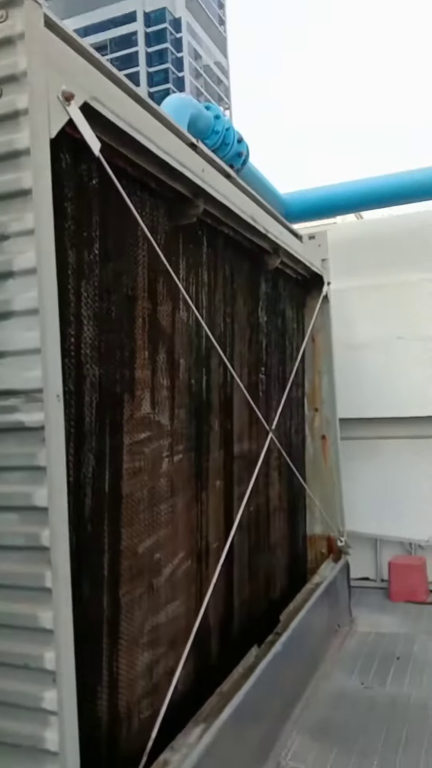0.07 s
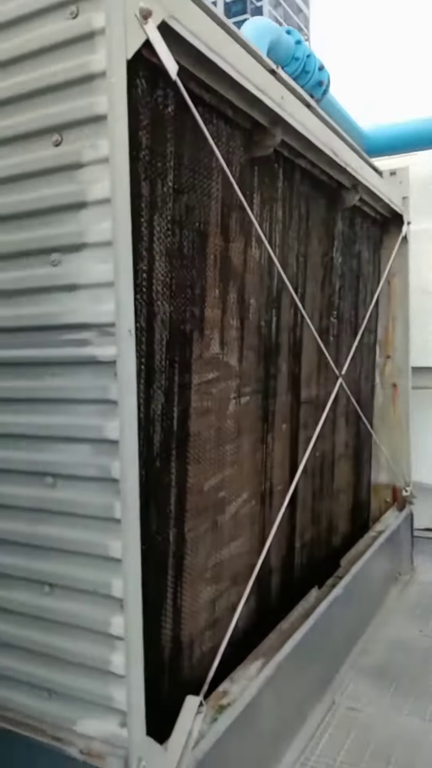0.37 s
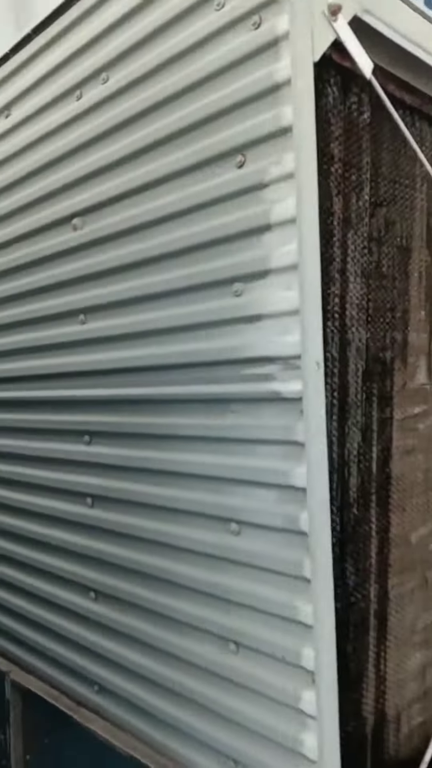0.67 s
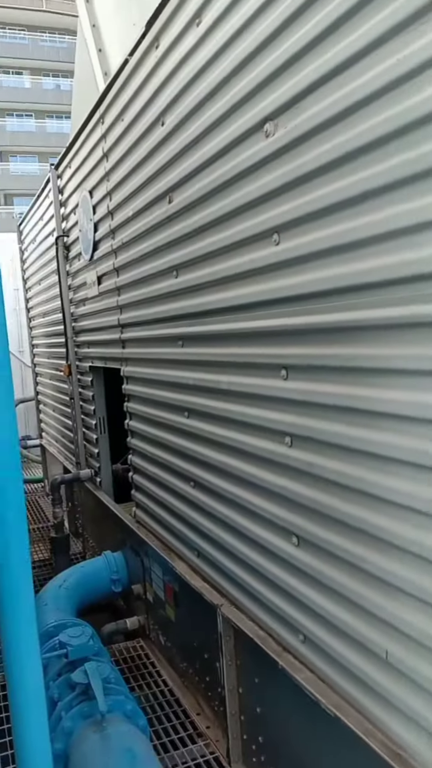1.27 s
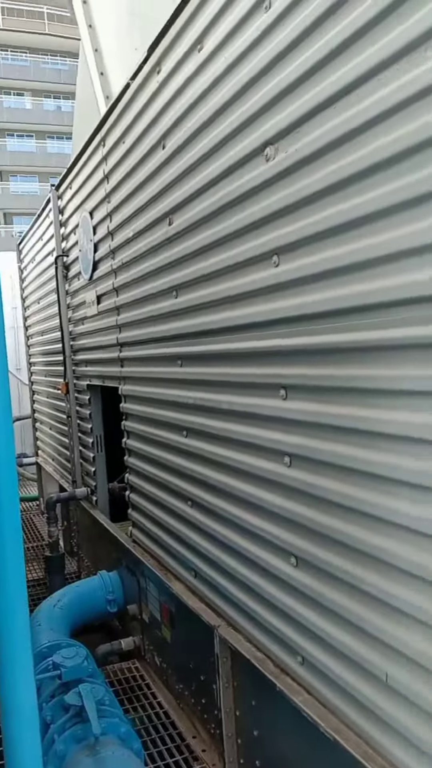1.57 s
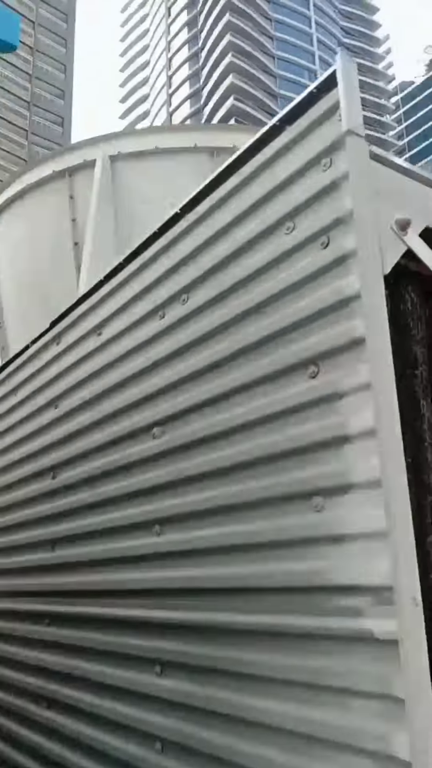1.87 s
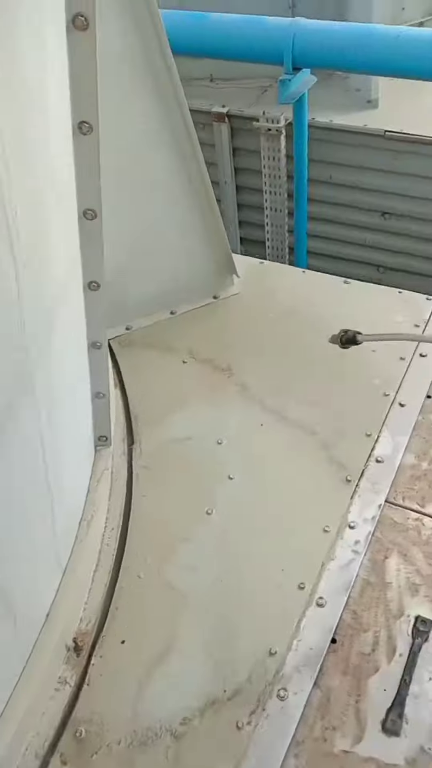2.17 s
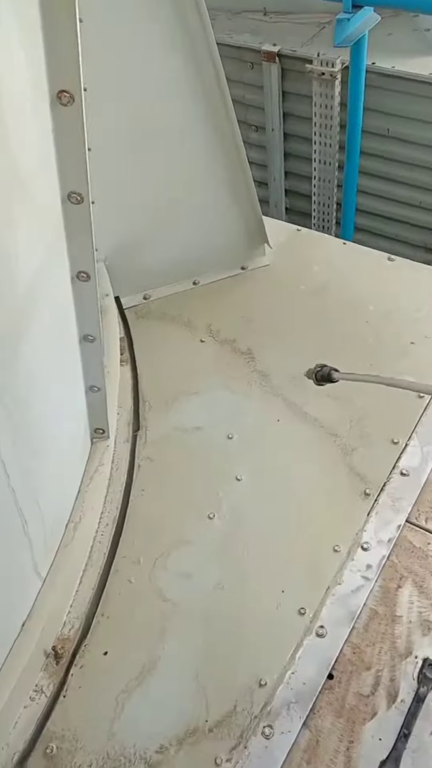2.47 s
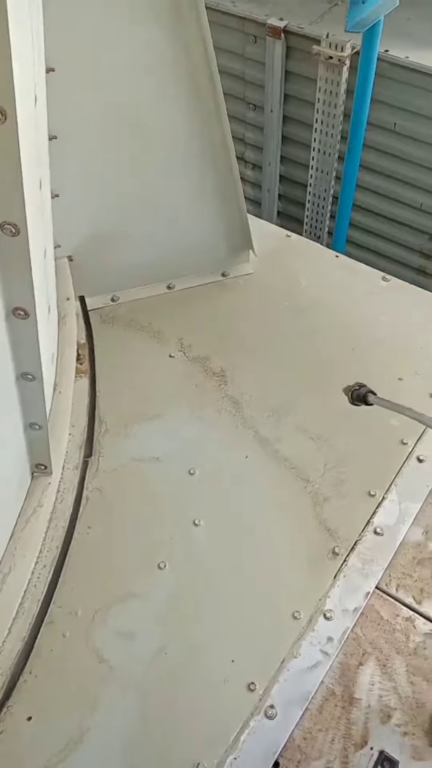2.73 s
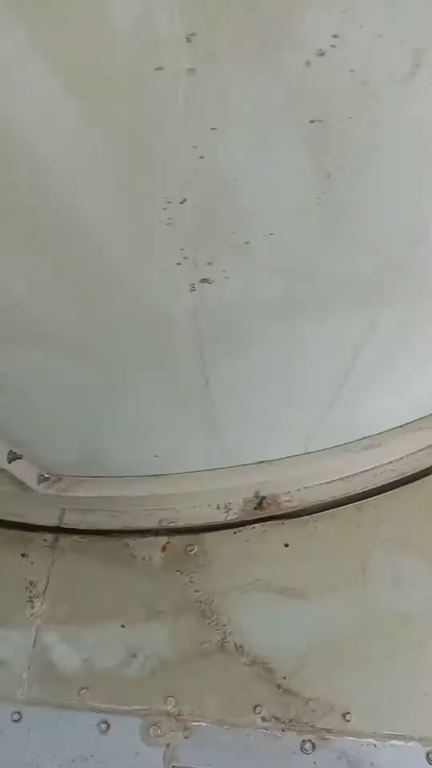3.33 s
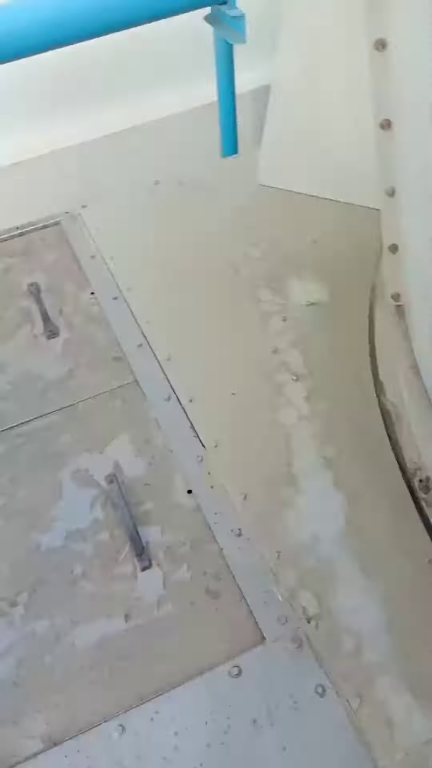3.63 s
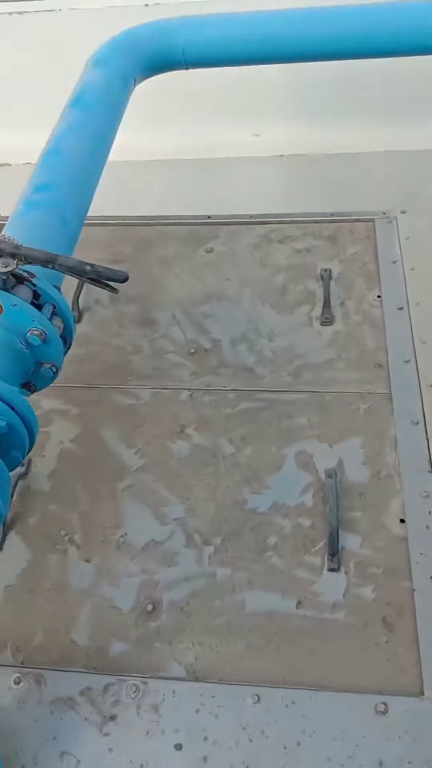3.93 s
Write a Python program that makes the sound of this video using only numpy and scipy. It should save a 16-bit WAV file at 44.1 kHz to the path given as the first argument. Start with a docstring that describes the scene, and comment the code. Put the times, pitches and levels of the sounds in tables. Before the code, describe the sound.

Cooling tower water and fan air rush, then wind buffets the microphone over the fan.

```python
"""A rooftop cooling tower, heard through a small hand-held microphone.
First, beside the louvres, water showers through the fill, with single drips and splats, over the
turbulent rush of fan air and the narrow-band whine of its drive. A short silence follows.
Then the top deck fades in: the water is faint, the fan rushes on, and the pressure fluctuations
of gusts buffet the microphone and push down its limiter."""
import sys
import numpy as np
from scipy import signal
from scipy.fft import rfft, irfft
from scipy.io import wavfile
from scipy.ndimage import uniform_filter1d, minimum_filter1d

SR = 44100
rng = np.random.default_rng(int(sys.argv[2]) if len(sys.argv) > 2 else 0)


def store_wav(level_fs):
    """Save 16-bit WAV to argv[1]."""
    pcm = np.round(np.clip(np.atleast_2d(level_fs), -1, 1) * 32767)
    wavfile.write(sys.argv[1], SR, pcm.T.astype(np.int16))


N = 176400
T = np.arange(N) / SR
HZ = np.fft.rfftfreq(N, 1 / SR)


def amp(db):
    """Amplitude ratio of a level in decibels."""
    return 10 ** (np.asarray(db) / 20)


def unit(x):
    """Normalisation to rms 1."""
    return x / np.sqrt(np.mean(x ** 2) + 1e-20)


def level_at(points):
    """Linear interpolation in time between (time_s, level_db) points."""
    return np.interp(T, *np.transpose(points))


def response(points, hz=HZ):
    """Magnitude response through (frequency_hz, level_db) points, then -12 dB per octave."""
    f, db = np.transpose(points)
    rolloff = np.minimum(f[-1] / (hz + 1), 1) ** 2
    return amp(np.interp(np.log(hz + 1), np.log(f + 1), db)) * rolloff


def filtered(x, gain):
    """Zero-phase filtering: each frequency is multiplied by its gain."""
    return irfft(rfft(x) * gain, N)


def coloured(x, spectrum):
    """Spectral shaping, at rms 1."""
    return unit(filtered(x, response(spectrum)))


def noise(spectrum):
    """Gaussian noise of the given spectrum, at rms 1."""
    return coloured(rng.standard_normal(N), spectrum)


def wander(rate_hz):
    """Random modulation: noise low-passed at the given rate, at rms 1."""
    return unit(filtered(rng.standard_normal(N), (HZ > 1) / (1 + (HZ / rate_hz) ** 2)))


def evened(x, samples):
    """Division by the running rms evens out swells longer than the window."""
    power = abs(uniform_filter1d(unit(x) ** 2, samples))
    return unit(x / np.sqrt(power + 0.1))


def swell(start_s, rise_s):
    """Transient envelope: a peak one rise time after the start, then exponential decay."""
    age = np.clip((T - start_s) / rise_s, 0, 40)
    return (age * np.exp(1 - age)) ** 2


# fan air spectra beside the louvres and on the deck: frequency_hz, level_db
LOUVRE_AIR_SPECTRUM = [(20, -19), (110, -7.5), (250, -3.5), (430, -3.5), (620, 2), (1000, 1.5),
                       (1500, -12.5), (2200, -13.5), (5000, -24.5)]
DECK_AIR_SPECTRUM = [(20, -16), (90, 6.5), (190, -12.5), (520, -10), (740, 0.5), (1050, -1), (1700, -9),
                     (2300, -19), (5000, -44)]
def fan_air(spectrum, level_db, flutter_db=2):
    """Turbulence in the fan's air radiates broadband noise that flutters slightly."""
    return noise(spectrum) * amp(level_db + flutter_db * wander(rate_hz=16))


# whine of the drive as the microphone moves: time_s, level_db
WHINE_LEVELS = [(0, -38.5), (1.3, -39), (1.55, -35.5), (2.2, -40.5), (3.3, -40.5), (4, -40.5)]
def drive_whine(pitch_hz=1277, width_hz=145, sway_hz=20):
    """The fan drive sings in a narrow band of noise; frequency modulation sways its pitch."""
    resonance = 1 / (1 + (2 * (HZ - pitch_hz) / width_hz) ** 2)
    sway = np.exp(2j * np.pi * np.cumsum(sway_hz * wander(rate_hz=10.3)) / SR)
    band = filtered(rng.standard_normal(N), resonance)
    whine = (signal.hilbert(band) * sway).real
    return evened(whine, samples=7000) * amp(level_at(WHINE_LEVELS))


# spectra of wind rumble and of the crackle of hard eddies: frequency_hz, level_db
RUMBLE_SPECTRUM = [(20, -38.5), (50, -6.5), (100, 2.5), (170, -0.5), (260, -7), (380, -15), (600, -25.5),
                   (2500, -59)]
CRACKLE_SPECTRUM = [(60, -4.5), (350, 15), (800, 2), (1500, -3), (2700, -14), (4000, -21.5), (5500, -30),
                    (7500, -62.5)]
# wind strength at the microphone: time_s, level_db
LOUVRE_BREEZE = [(0, -43.5), (1.26, -53), (1.301, -29), (1.36, -36), (1.42, -51), (1.62, -47.5),
                 (1.719, -26), (1.83, -47)]
DECK_GUSTS = [(2.22, -38), (2.302, -22), (2.36, -37), (2.40, -25.5), (2.54, -22.5), (2.62, -12.5),
              (2.77, -14.5), (2.83, -19.5), (2.95, -18.5), (3.14, -13), (3.19, -23.5), (3.26, -25.5),
              (3.33, -44.5), (3.402, -27), (3.47, -50), (3.61, -61), (3.634, -27.5), (4, -26)]
def wind(strength, lumps_db=3.5, rasp_db=-14):
    """Turbulent pressure on the microphone rumbles; a rasp grows as the rumble to the power 1.5."""
    gain = amp(level_at(strength) + lumps_db * wander(rate_hz=55))
    rumble = evened(noise(RUMBLE_SPECTRUM), samples=700)
    rasp = amp(rasp_db) * np.sqrt(gain) * noise(CRACKLE_SPECTRUM)
    return gain * (rumble + rasp)


# eddies at the microphone, before the bass roll-off: centre_s, half_width_s, thump_db, crackle_db
EDDIES = [(2.399, 0.014, -17.5, -42), (2.454, 0.006, -13.5, -44), (2.588, 0.0013, -0.5, -17.5),
          (2.606, 0.0095, 3.5, -17), (2.661, 0.0025, -16, -10.5), (2.677, 0.0028, 1, -12),
          (2.689, 0.0049, -10, -18), (2.73, 0.0037, -3, -19.5), (2.763, 0.016, -2, -10),
          (2.929, 0.0057, -11, -25), (2.994, 0.0082, -4, -19), (3.05, 0.0046, -8, -10.5),
          (3.074, 0.014, -5, -8.5), (3.124, 0.003, -8, -13), (3.638, 0.011, -10.5, -29.5),
          (3.663, 0.006, -14.5, -39), (3.715, 0.0086, -8, -36), (3.742, 0.007, -13, -33),
          (3.786, 0.0036, -8.5, -44), (3.946, 0.005, -17.5, -35)]
def buffets(highpass_hz=138):
    """Pressure pulses of eddies: each thumps, and hard ones crackle; the sum is high-passed, so the thumps
    carry little deep bass."""
    thump = evened(noise(RUMBLE_SPECTRUM), samples=300)
    crackle = unit(noise(CRACKLE_SPECTRUM) * amp(2.5 * wander(rate_hz=240)))
    out = np.zeros(N)
    for centre_s, half_width_s, thump_db, crackle_db in EDDIES:
        near = abs(T - centre_s) < .05
        pulse = np.exp(-((T[near] - centre_s) / half_width_s) ** 2)
        out[near] += pulse * (amp(thump_db) * thump[near] + amp(crackle_db) * crackle[near])
    return filtered(out, HZ ** 2 / np.hypot(HZ ** 2, highpass_hz ** 2))


def patchy(x, depth_db):
    """Random amplitude modulation makes each region of the spectrum flicker by itself."""
    spectrogram = signal.stft(x, nperseg=256)[2]
    field = rng.standard_normal(spectrogram.shape)
    for axis in (0, 1):  # smooth over frequency, then time
        field = uniform_filter1d(field, size=4, axis=axis)
    return unit(signal.istft(spectrogram * amp(depth_db * unit(field)))[1][:N])


def impacts(per_s, spread_db):
    """Drop impacts as a Poisson process: clicks, mostly small and a few large."""
    sizes = amp(spread_db * np.minimum(rng.exponential(1, N), 5))
    return sizes * rng.choice([-1, 1], N) * (rng.random(N) < per_s / SR)


def droplet_ticks(pitches=20, decay_cycles=5.6):
    """Damped oscillation: each droplet rings for a few cycles at one of many pitches."""
    clicks = impacts(per_s=900, spread_db=1.5)
    pitch_index = rng.integers(0, pitches, N)
    out = np.zeros(N)
    for k, pitch_hz in enumerate(np.geomspace(1600, 12000, pitches)):
        age = T[:512] * pitch_hz / decay_cycles
        ring = np.sqrt(pitch_hz) * age * np.exp(-age) * np.sin(2 * np.pi * decay_cycles * age)
        out += signal.oaconvolve(clicks * (pitch_index == k), ring)[:N]
    return out


# spectrum of water falling through the fill: frequency_hz, level_db
WATER_SPECTRUM = [(300, -34.5), (1500, -2.5), (2300, -5.5), (3100, 1.5), (3800, 1.5), (5800, -4.5),
                  (7300, -9.5), (9400, -7.5), (11000, -11.5), (15500, -24.5)]
def shower(wash_db=-34.5, spray_db=-39.5, ticks_db=-40, flicker_db=1):
    """Superposition of many drops: a flickering wash under fine spray and pitched ticks."""
    wash = amp(wash_db) * patchy(noise(WATER_SPECTRUM), depth_db=3.4)
    spray = amp(spray_db) * coloured(impacts(per_s=5200, spread_db=5), WATER_SPECTRUM)
    ticks = amp(ticks_db) * coloured(droplet_ticks(), WATER_SPECTRUM)
    return (wash + spray + ticks) * amp(-flicker_db * wander(rate_hz=25))


# water on the deck, relative to beside the louvres: time_s, gain_db
DECK_WATER_GAINS = [(2.9, -12.5), (3.7, -16)]
def shower_through_casing(water, lowpass_hz=5800):
    """Transmission loss rises with frequency, so the shower reaches the deck faint and dull."""
    return filtered(water, 1 / (1 + (HZ / lowpass_hz) ** 2)) * amp(level_at(DECK_WATER_GAINS))


# near drops falling in the basin: start_s, peak_db, pitch_hz
BASIN_DRIPS = [(0.4961, -10.5, 2910), (0.768, -14, 3020), (0.7707, -16.5, 3230), (1.0935, -16.5, 3200),
               (1.306, -22.5, 3020), (1.4362, -19.5, 3600), (2.071, -18, 2900)]
def drips(rise_s=0.00062):
    """Each drop excites a heavily damped oscillation, a blip of a few cycles."""
    return sum(amp(peak_db) * swell(start_s, rise_s) * np.sin(2 * np.pi * pitch_hz * (T - start_s))
               for start_s, peak_db, pitch_hz in BASIN_DRIPS)


# near drops bursting on hard surfaces: start_s, level_db, centre_hz
HARD_SPLATS = [(0.5086, -29.5, 8500), (0.7945, -25, 8150), (0.9208, -22.5, 8500), (1.2999, -33.5, 7140),
               (1.454, -29, 7700), (1.588, -36, 12000), (1.8028, -30, 8600), (1.8716, -25.5, 9200),
               (1.8805, -27, 7740), (1.952, -39, 11400), (1.9879, -34, 11500), (3.7, -50, 9600)]
def splats(rise_s=0.0014, half_width_octaves=0.4):
    """Impact noise: each drop bursts in a short, bright, band-limited fizz."""
    out = np.zeros(N)
    for start_s, level_db, centre_hz in HARD_SPLATS:
        band = np.exp(-(np.log2((HZ + 1) / centre_hz) / half_width_octaves) ** 2)
        fizz = unit(filtered(rng.standard_normal(N), band))
        out += amp(level_db) * np.sqrt(swell(start_s, rise_s)) * fizz
    return out


def scene(louvres_end_s=2.156, deck_start_s=2.2183, fade_in_s=0.092):
    """The sources superpose beside the louvres and then, after a short silence, on the top deck."""
    whine, water = drive_whine(), shower()
    louvres = fan_air(LOUVRE_AIR_SPECTRUM, level_db=-36) + whine + wind(LOUVRE_BREEZE)
    louvres += water + drips()
    deck = fan_air(DECK_AIR_SPECTRUM, level_db=-36.5) + whine + wind(DECK_GUSTS)
    deck += buffets() + shower_through_casing(water)
    fade_out = np.clip((louvres_end_s - T) / .002, 0, 1)
    fade_in = np.clip((T - deck_start_s) / fade_in_s, 0, 1) ** 1.51
    return (fade_out * louvres + fade_in * deck + splats())[None]


# treble ripples of the microphone: frequency_hz, gain_db
MIC_RESPONSE = [(2300, -1), (3700, -4.5), (4500, -10.5), (5200, -7), (5800, -1), (6300, -5.5), (6700, 0),
                (7350, -0.5), (8100, -14.5), (9300, -8), (11000, -8.5), (12800, -14.5), (13900, -13),
                (15200, 2)]
def microphone(x, port_hz=1275, width_hz=250, port_db=4.5):
    """The resonance of the port and a rippled treble response colour the sound."""
    hz = np.fft.rfftfreq(2 * N, 1 / SR)
    port_power = 1 + (amp(port_db) ** 2 - 1) / (1 + (2 * (hz - port_hz) / width_hz) ** 2)
    return irfft(rfft(x, 2 * N) * response(MIC_RESPONSE, hz) * np.sqrt(port_power))[:N]


def limiter(x, threshold_db=-18, share=0.69, window_s=0.041, hold_s=0.022, decay_db_per_s=192):
    """Compression: the excess over a threshold is held, decays, and a share of it lowers the gain."""
    power = abs(uniform_filter1d(x ** 2, int(window_s * SR)))
    excess_db = np.maximum(10 * np.log10(power + 1e-12) - threshold_db, 0)
    half_hold = int(hold_s * SR / 2)
    held_db = -minimum_filter1d(-excess_db, 2 * half_hold + 1, origin=half_hold)
    decaying_db = np.maximum.accumulate(held_db + decay_db_per_s * T) - decay_db_per_s * T
    return x * amp(-share * uniform_filter1d(decaying_db, size=200))


def record(dry, band_edge_hz=15520):
    """Transduction: microphone colour, a quick limiter, then a steep low-pass."""
    limited = limiter(microphone(dry[0]))
    lowpass = signal.firwin(1023, band_edge_hz, window=("kaiser", 9), fs=SR)
    return signal.oaconvolve(limited, lowpass, "same")[None]


dry = scene()
out = record(dry)
store_wav(out)
```